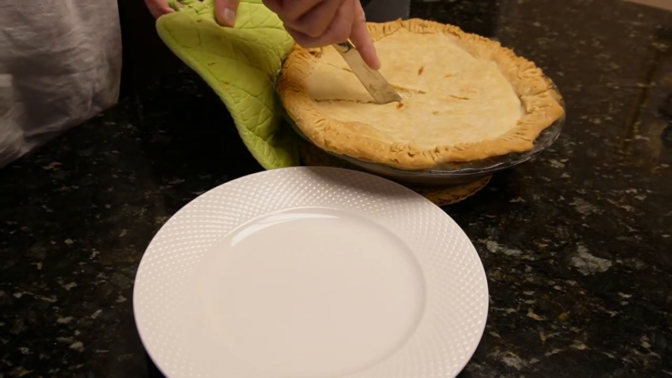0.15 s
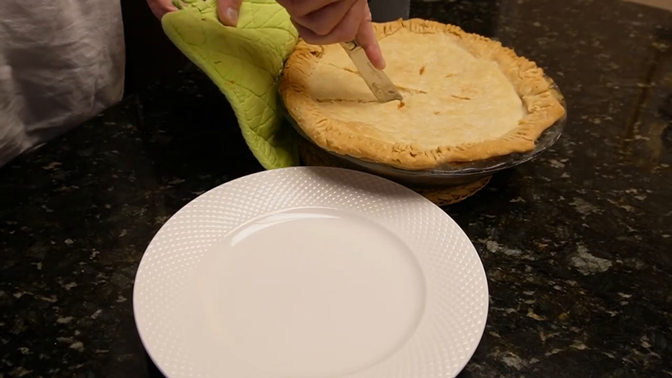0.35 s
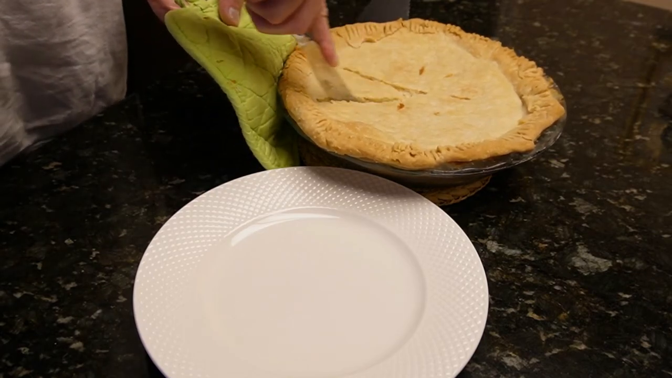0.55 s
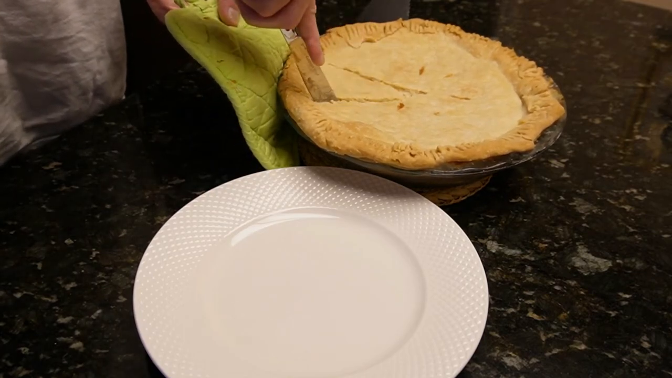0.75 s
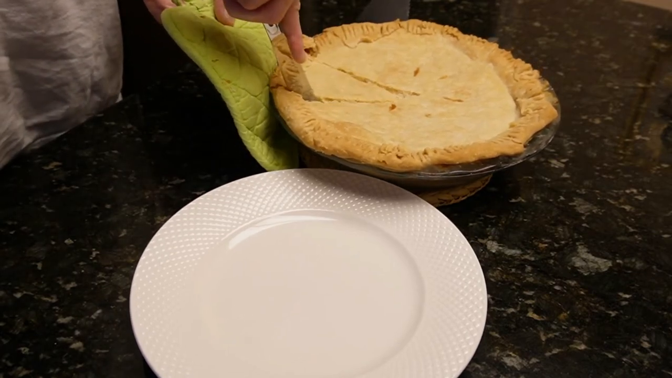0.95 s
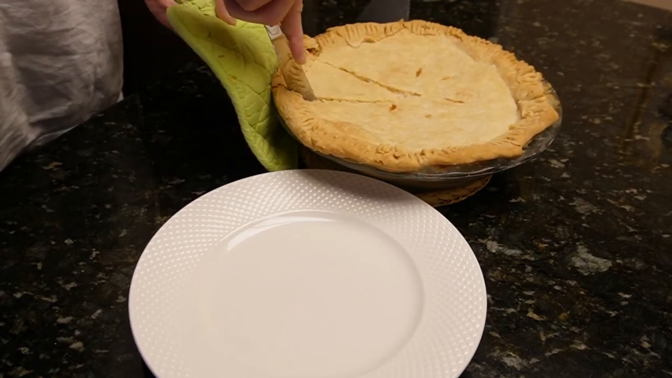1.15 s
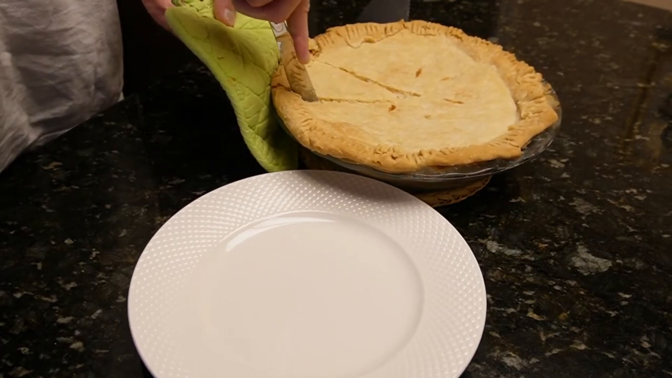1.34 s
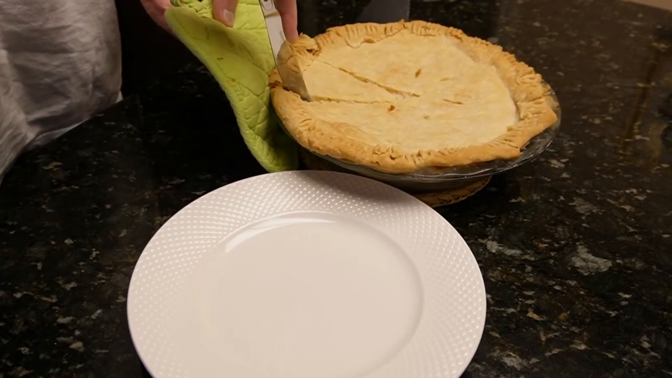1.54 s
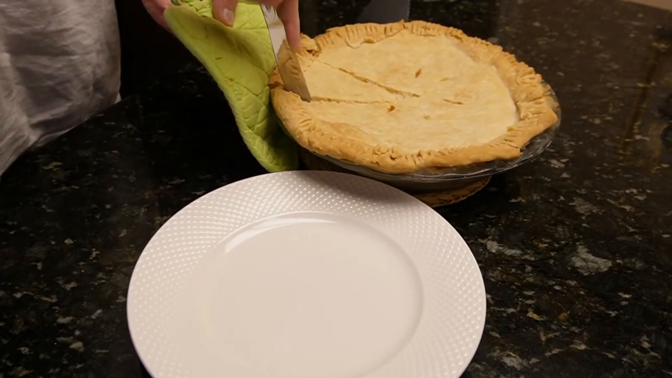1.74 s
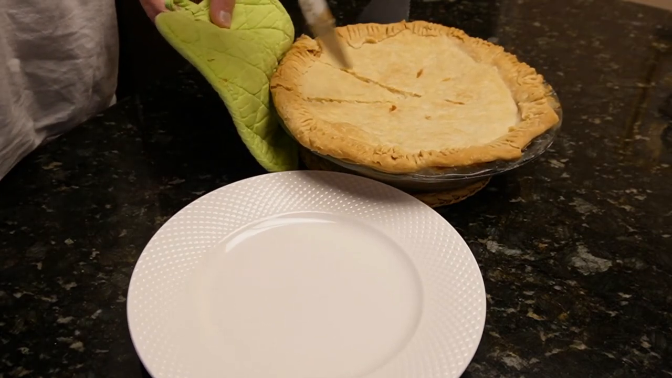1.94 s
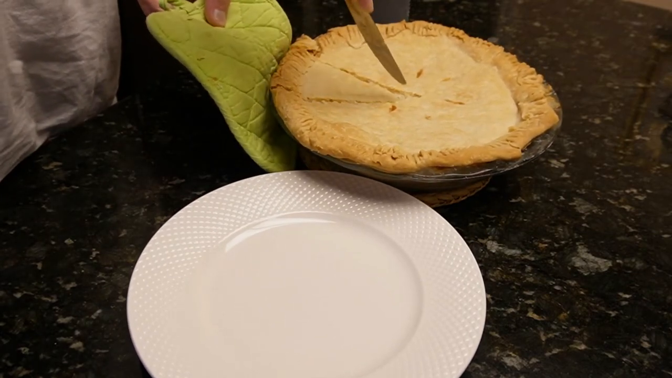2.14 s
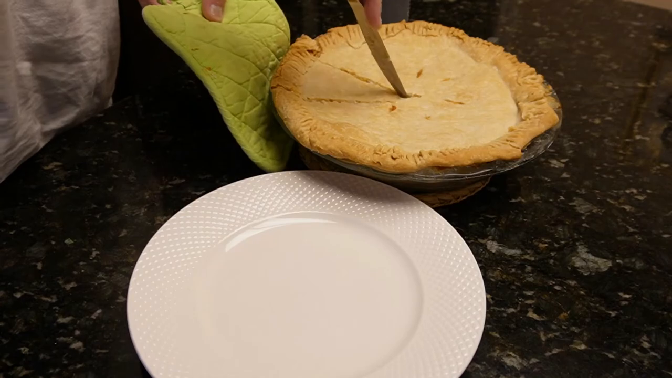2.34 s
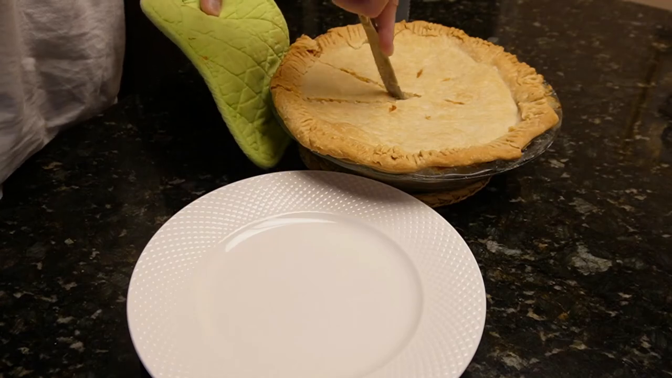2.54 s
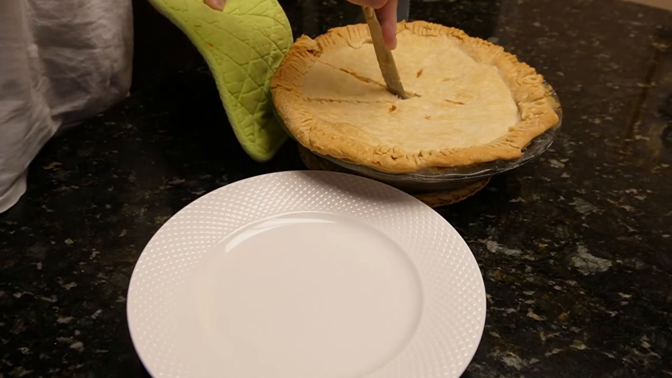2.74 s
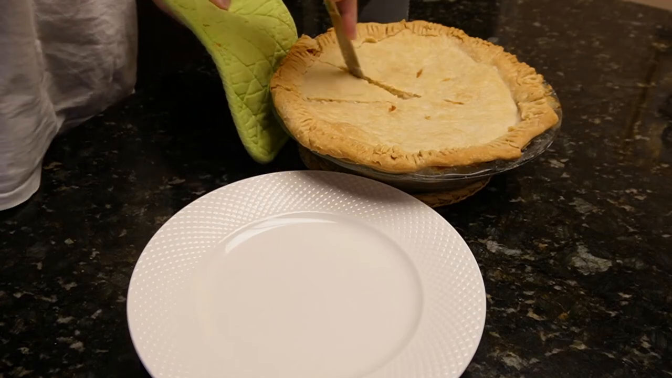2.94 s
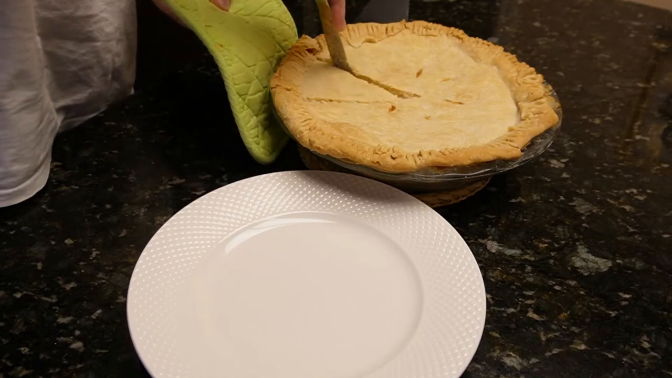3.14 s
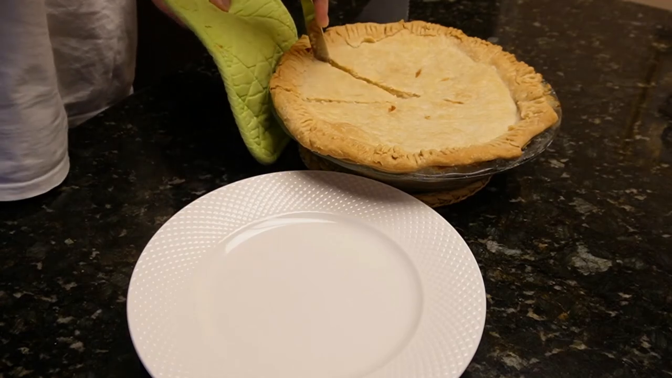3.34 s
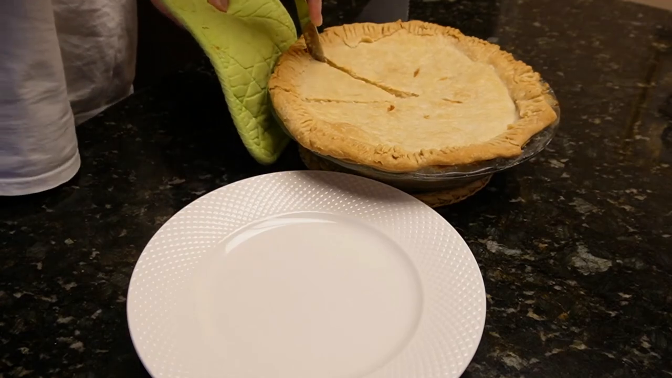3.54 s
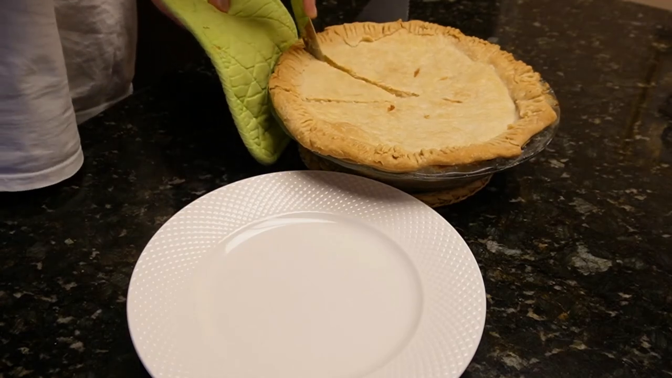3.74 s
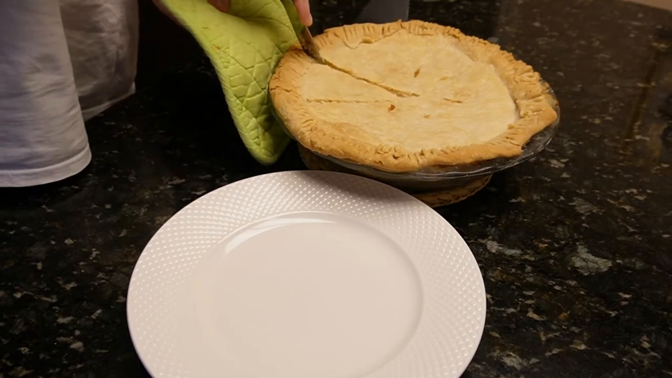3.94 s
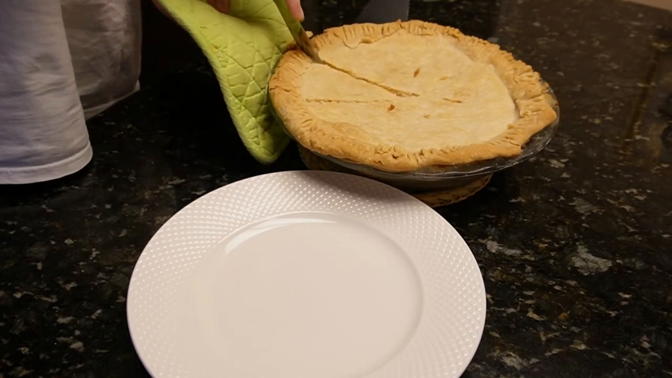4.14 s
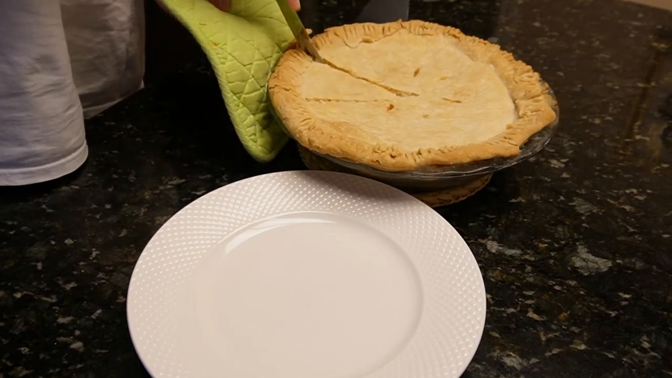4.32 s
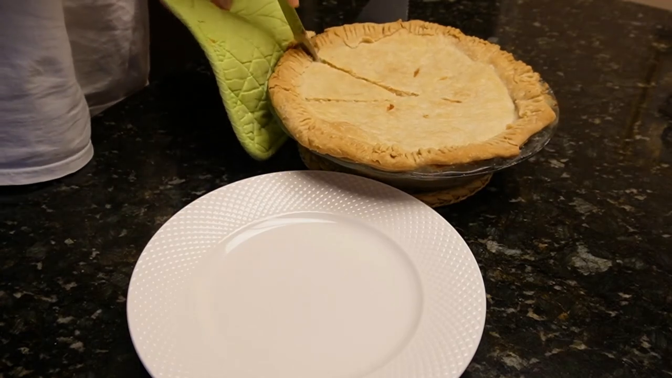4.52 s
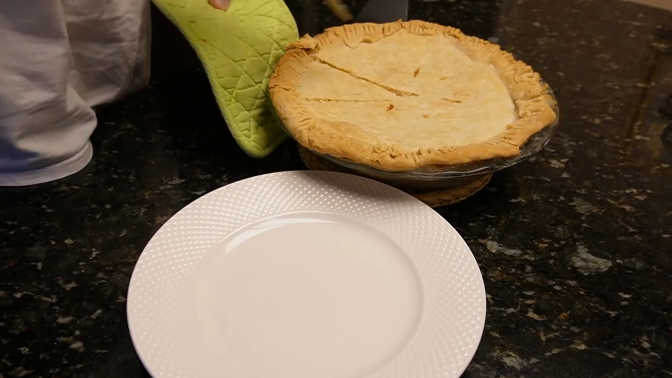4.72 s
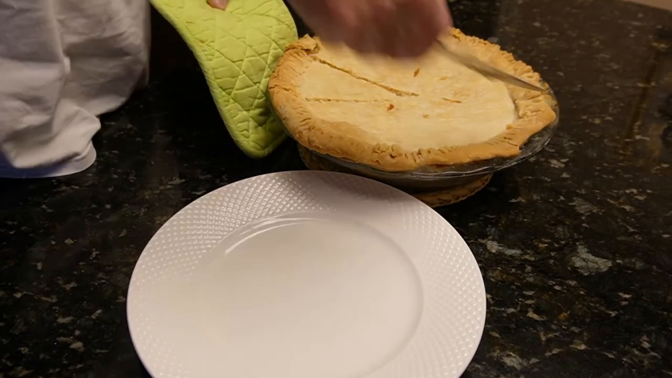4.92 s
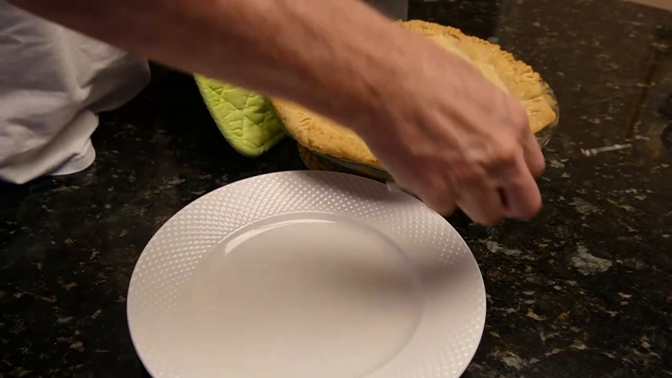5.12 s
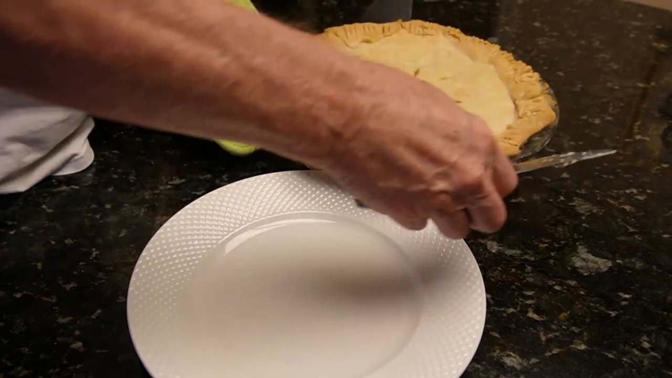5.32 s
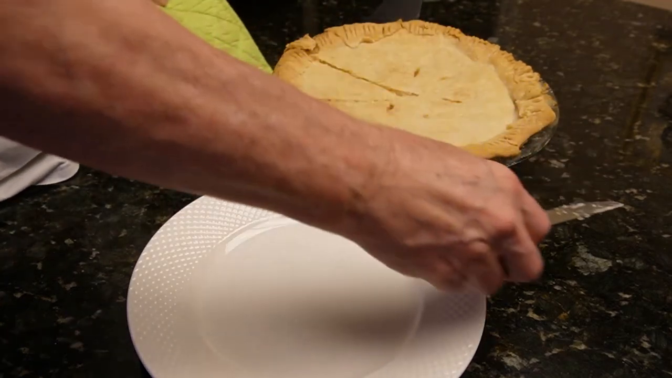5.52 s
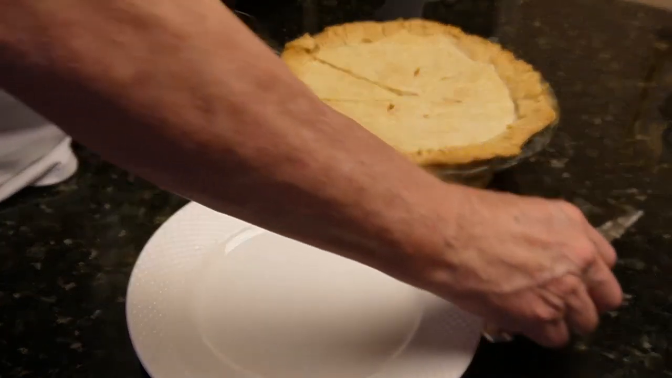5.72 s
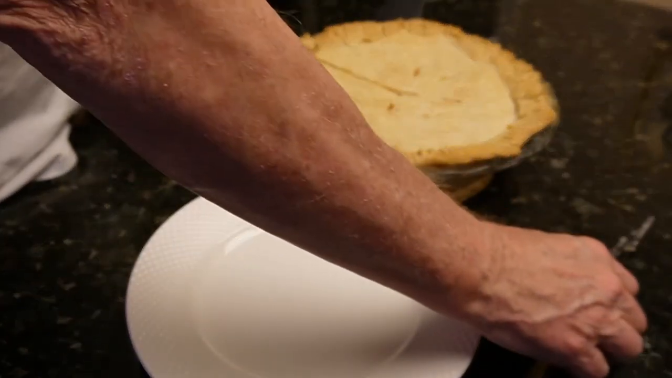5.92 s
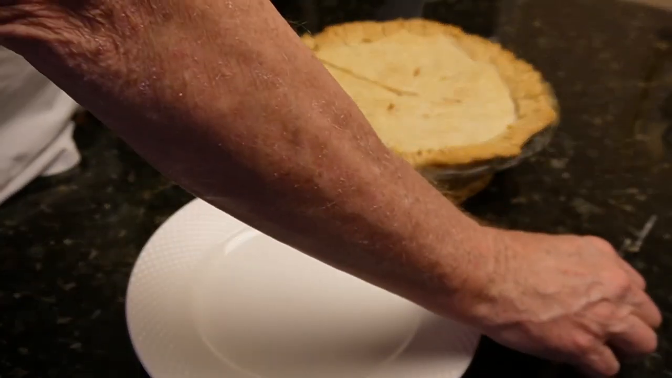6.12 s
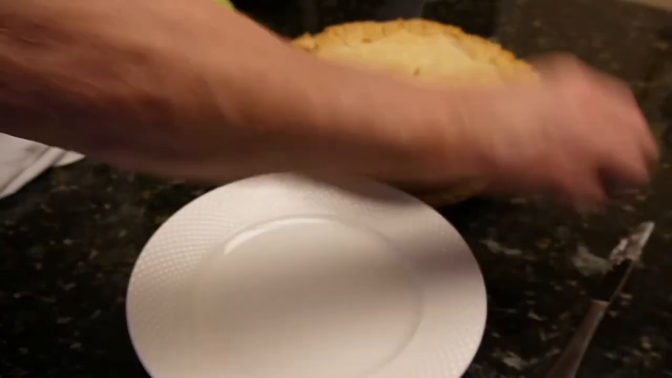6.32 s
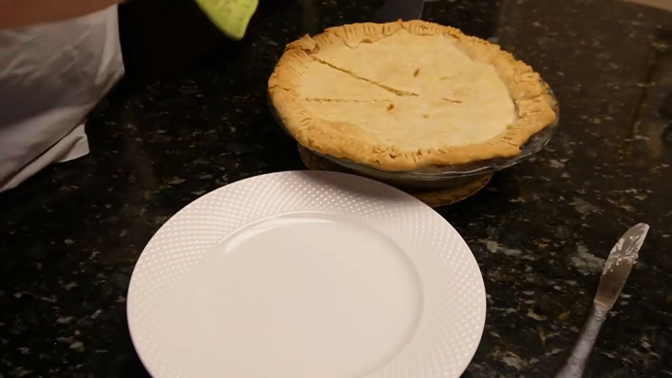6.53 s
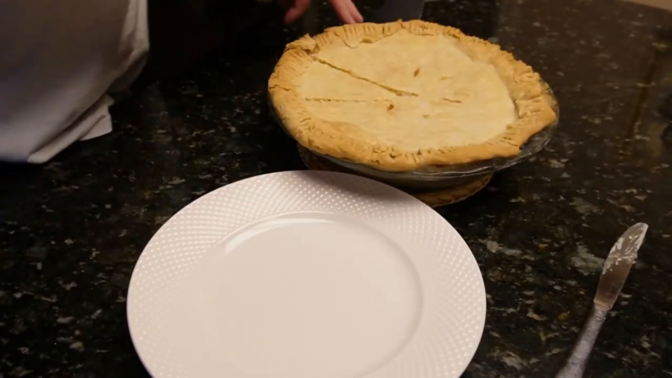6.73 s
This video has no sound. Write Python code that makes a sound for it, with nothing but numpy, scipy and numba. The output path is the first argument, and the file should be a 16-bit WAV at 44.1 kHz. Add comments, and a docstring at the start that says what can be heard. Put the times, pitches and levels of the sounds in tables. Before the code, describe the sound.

A knife clinks and saws squeakily through pie crust in a glass dish before being set down with a metallic clatter.

```python
"""A table knife cuts two lines through a baked pie crust in a glass dish. The blade stabs and rubs through
crumbling pastry, knocks the glass into ringing and saws at the rim with gliding squeaks and sharp snaps.
Then it is laid on a stone counter, where it rocks and rattles. Dish and hand bump softly, a sleeve
rustles and an appliance hums in a hard-walled kitchen."""
import sys
import numpy as np
from scipy import signal
from scipy.fft import rfft, irfft, next_fast_len
from scipy.io import wavfile
from scipy.ndimage import uniform_filter1d
from numba import njit

SR = 44100
rng = np.random.default_rng(int(sys.argv[2]) if len(sys.argv) > 2 else 0)


def persist_wave(psi):
    """Save psi, clipped to +-1, as 16-bit WAV."""
    counts = np.round(np.clip(psi, -1, 1) * 32767).astype(np.int16)
    wavfile.write(sys.argv[1], SR, np.atleast_2d(counts).T)


N = 302967


def amp(db):
    return np.exp(np.asarray(db) * (np.log(10) / 20))


def unit_rms(x):
    return x / np.sqrt(np.mean(x ** 2) + 1e-20)


def butter(x, order, hz, kind="low"):
    return signal.sosfilt(signal.butter(order, hz, kind, fs=SR, output="sos"), x)


def swell(s, db, rise, hold, fall):
    """An envelope that climbs 20 dB per rise time to its top at s, holds, and drops 20 dB per fall time."""
    rise, fall, out = max(rise, 1e-3), max(fall, 1e-3), np.zeros(N)
    first, last = (int(np.clip(v * SR, 0, N)) for v in (s - 4 * rise, s + hold + 4 * fall))
    t = np.arange(first, last) / SR - s
    out[first:last] = amp(db - 20 * np.maximum(np.maximum(-t / rise, (t - hold) / fall), 0))
    return out


def clicks(times, sizes):
    """Single clicks on an inaudible ripple that keeps the filters quick."""
    out = 1e-18 * np.cos(np.arange(N))
    np.add.at(out, np.round(np.asarray(times) * SR).astype(int), sizes)
    return out


def grains(per_s, spread_db):
    """Random clicks of very uneven size, rms about 1."""
    sizes = amp(spread_db * np.minimum(rng.exponential(1, N), 4)) * rng.choice([-1, 1], N)
    return unit_rms(sizes * (rng.random(N) < per_s / SR)) + 1e-18


def ring(x, hz, t60):
    """A unit click sets a sine of height about 1 ringing."""
    r, w = amp(-60 / (t60 * SR)), 2 * np.pi * hz / SR
    return signal.lfilter([.5, 0, -.5], [1, -2 * r * np.cos(w), r * r], x)


def resonances(x, peaks, treble_db=0):
    """Parallel peaks (f/Hz, width/Hz, level/dB) of alternating sign; treble_db lifts those over 4 kHz."""
    out, lifted = 0, x * amp(treble_db)
    for k, (hz, width, db) in enumerate(peaks):
        r = np.exp(-np.pi * width / SR)
        poles = [1, -2 * r * np.cos(2 * np.pi * hz / SR), r * r]
        band = signal.lfilter([1 - r, 0, r - 1], poles, lifted if hz > 4000 else x)
        out = out + (-1) ** k * amp(db) * band
    return out


@njit
def glide(x, hz, width_hz):
    """A resonance whose centre moves."""
    cosine, r = np.cos(2 * np.pi * hz / SR), np.exp(-np.pi * width_hz / SR)
    y = np.zeros(len(x))
    for i in range(2, len(x)):
        y[i] = (1 - r) * (x[i] - x[i - 2]) + 2 * r * cosine[i] * y[i - 1] - r * r * y[i - 2]
    return y


def equalise(x, curve):
    """Shape by an EQ curve of (f/Hz, level/dB) points."""
    hz, db = np.transpose(curve)
    size = next_fast_len(N)
    log_hz = np.log(np.fft.rfftfreq(size, 1 / SR) + 1)
    return irfft(rfft(x, size) * amp(np.interp(log_hz, np.log(hz), db)), size)[:N]


def spread(mid, side):
    """Narrow stereo: left and right differ mainly at short wavelengths."""
    side = butter(side, 1, 3000, "high")
    return np.array([mid + side, mid - side])


def wide_noise(curve, side_db):
    """Stereo noise, alike in the bass and looser in the treble; rms 1."""
    mid, side = rng.standard_normal((2, N))
    return unit_rms(np.array([equalise(channel, curve) for channel in spread(mid, amp(side_db) * side)]))


# EQ of the still room: f/Hz, level/dB
ROOM_TONE_EQ = [(12, -70), (20, -43), (45, -13), (88, -10), (123, -4.5), (150, -11), (187, 1.5),
                (262, -11.5), (367, -9.5), (574, -22.5), (1190, -26.5), (1860, -27), (2020, -28.5),
                (2820, -29.5), (16000, -42.5)]
def room_tone():
    """A steady bed of low, wide noise."""
    return amp(-70.5) * wide_noise(ROOM_TONE_EQ, side_db=3.5)


# partials of the hum: f/Hz, width/Hz, rms level/dB
HUM_PARTIALS = [(62.5, 1.3, -82.5), (118.3, 8.9, -92.5), (177.94, 5.8, -76), (283.5, 49, -80),
                (360.8, 52, -80.5)]
def appliance_hum():
    """Noise passed twice through each narrow resonance gives a wavering hum."""
    noise, out = rng.standard_normal(N), 0
    for hz, width, db in HUM_PARTIALS:
        peak = [(hz, width, 0)]
        out = out + amp(db) * unit_rms(resonances(resonances(noise, peak), peak))
    return out


# decay of the room: f/Hz, t60/s
KITCHEN_DECAY = [(250, 0.82), (1000, 0.53), (3000, 0.47), (7000, 0.39), (13000, 0.17)]
def kitchen_reverb(x, side_db):
    """Hard walls return a dense tail that builds up, then dies away, treble first."""
    t, tail = np.arange(SR * 3 // 4) / SR, 0
    hz, t60 = np.transpose(KITCHEN_DECAY)
    edges = np.r_[60, np.sqrt(hz[1:] * hz[:-1]), 19000]
    for low, high, seconds in zip(edges, edges[1:], t60):
        band = butter(rng.standard_normal((2, len(t))), 2, [low, high], "band")
        tail = tail + band * amp(-60 * t / seconds)
    build_up = 1 - np.exp(-t / 0.0027)
    mid, side = signal.fftconvolve(x[None], tail * build_up, axes=1)[:, :N]
    return spread(mid, amp(side_db) * side)


# EQ of soft rubbing: f/Hz, level/dB
RUB_EQ = [(350, -42), (600, -2.5), (1020, -8), (1130, -2.5), (1240, -5.5), (1870, -9), (3650, -11),
          (7550, -19.5), (15800, -34)]
# soft rubs of cloth and of the knife dragging through crust:
# briskest t/s, level/dB, rise/s, fall/s, brightness/dB
SOFT_RUBS = [(.005, -86, 0.011, 0.095, 13), (.12, -91, 0.3, 0.38, 18.5), (.44, -83.5, .12, 0.25, 17),
             (.62, -73, 0.1, 0.1, -1), (0.877, -77, 0.069, 0.6, 13.5), (2.028, -68, 0.15, 0.13, -13),
             (2.285, -86, 0.013, 0.29, 17), (2.409, -93, 0.11, 0.09, 23), (2.6, -89, 0.051, 0.083, 32.5),
             (3.002, -66, 0.25, 0.12, 14), (3.22, -82, 0.064, 0.064, 24.5),
             (3.466, -82, 0.013, 0.033, 11.5), (3.619, -89.5, .012, 0.017, 20.5),
             (4.748, -79.5, 0.14, 0.25, 4.5), (5.29, -81.5, 0.29, 0.23, 1), (5.44, -82.5, 0.08, 0.26, 25),
             (5.749, -88, 0.16, 0.31, 20)]
def soft_rubbing():
    """Friction noise of cloth or dragging knife swells over a faint floor; a brisker rub lifts the top."""
    friction = wide_noise(RUB_EQ, side_db=-5.5)
    level, treble_lift = amp(-92.5), 0
    for s, db, rise, fall, bright_db in SOFT_RUBS:
        rub = swell(s, db, rise, 0, fall)
        level = level + rub
        treble_lift = treble_lift + rub * (amp(bright_db) - 1)
    return level * friction + treble_lift * butter(friction, 1, 6000, "high")


# bumps of dish and hand: t/s, level/dB, f/Hz
SOFT_BUMPS = [(0.885, -54.5, 268), (.932, -42.5, 230), (1.219, -47, 234), (1.454, -47, 240),
              (1.637, -42.5, 263), (1.997, -49.5, 190.5), (2.548, -48.5, 250), (3.215, -55, 179),
              (3.576, -55.5, 193.3), (3.925, -46.5, 250)]
def soft_bumps(t60=0.082):
    """Each bump is a short low ring from a soft contact, with the counter thudding under it."""
    rings = sum(ring(clicks([s], amp(db)), hz, t60) for s, db, hz in SOFT_BUMPS)
    s, db, _ = np.transpose(SOFT_BUMPS)
    thud = ring(clicks(s, amp(db - 6)), 162, t60)
    return butter(rings + thud, 2, 1200)


# knife meeting the stone: t/s, level/dB, handle-end accent/dB
KNIFE_LANDINGS = [(6.0816, -42, 28.5), (6.2607, -24, 4.5), (6.288, -19, 16.5), (6.315, -18, -14),
                  (6.329, -11.5, -1), (6.383, -28, 3), (6.4141, -10.5, -17), (6.431, -9.5, -8),
                  (6.466, -14.5, -18), (6.494, -24.5, -18), (6.519, -28, -13)]
# spells of rocking: t/s, touch level/dB, clatter level/dB, hold/s, fall/s
ROCKING = [(6.077, -45.5, -47.5, 0.03, 0.073), (6.258, -22.5, -42.5, 0.056, 0.011),
           (6.324, -10, -34.5, 0.057, 0.085), (6.43, -26.5, -36, 0.093, 0.023)]
# modes of the free knife: f/Hz
FREE_KNIFE_HZ = [415, 1481, 4285, 4600, 5727, 6960, 7615, 8150, 8721, 9215, 10675, 10788, 12584, 13105,
                 14497, 14520]
# voicing of those modes: level/dB, t60/s, left minus right/dB
FREE_KNIFE_MODES = [(-31, 0.32, -4.5), (-27, 0.29, -1.5), (-22.5, 0.2, 4.5), (-19, 0.079, -9),
                    (-7, 0.14, -7.5), (-2.5, 0.086, -5), (-17.5, 0.071, -16.5), (-23, 0.21, 14.5),
                    (-0.5, 0.15, 0.5), (-17, 0.13, 5), (-1, 0.083, 1.5), (-15, 0.18, -21.5), (-8, 0.22, 9),
                    (-34, 0.12, -5.5), (-19.5, 0.091, 18), (-13, 0.26, -15.5)]
# modes that ring most when the handle end lands: f/Hz
HANDLE_MODES_HZ = [4285, 4600, 7615, 8150]
# EQ of the clatter between the modes: f/Hz, level/dB
CLATTER_EQ = [(300, -24.5), (600, -21.5), (900, -5), (1200, -13), (1550, -5.5), (2600, -8.5), (4500, -6.5),
              (7000, -13.5), (9000, -8.5), (11500, -35.5), (15000, -23), (15800, -32)]
def knife_rattle(touches_per_s=300, bounce_t60=0.03):
    """Landings and small touches ring the free knife; each mode has its own share of them and own pan."""
    s, db, handle_db = np.transpose(KNIFE_LANDINGS)
    touch_level = sum(swell(at, level, 0, hold, fall) for at, level, _, hold, fall in ROCKING)
    clatter_level = sum(swell(at, level, 0, hold, fall) for at, _, level, hold, fall in ROCKING)
    touches = touch_level * (rng.random(N) < touches_per_s / SR)
    bounce_level = signal.lfilter([1], [1, -amp(-60 / (bounce_t60 * SR))], clicks(s, amp(db - 19)))
    stone = unit_rms(equalise(grains(per_s=3000, spread_db=3.3), CLATTER_EQ))
    ticks = amp(-24) * signal.lfilter([1, 0, -1], [1, -.5, .1], clicks(s, amp(db)))
    out = ((bounce_level + clatter_level) * stone + ticks) * amp([[-1.1], [1.1]])
    for hz, (mode_db, t60, pan_db) in zip(FREE_KNIFE_HZ, FREE_KNIFE_MODES):
        colour_db = 0.4 * np.log2(hz / 7000) + handle_db * (hz in HANDLE_MODES_HZ)
        hit_db = db - 11 + colour_db + rng.normal(0, 6.6, len(s))
        blows = amp(-13.5) * touches * rng.standard_normal(N) + clicks(s, amp(hit_db))
        out += amp(mode_db + np.array([[pan_db], [-pan_db]]) / 2) * ring(blows, hz, t60)
    return out


# ringing hits on the glass and dull tip stabs through the crust:
# t/s, level/dB, thump/dB, top/dB, ring/dB, upper ring/dB, crunch t60/s
KNIFE_KNOCKS = [(0.2708, -82, 24.5, -45, -41, 2, .05), (0.9305, -21.5, -8, -35.5, -14.5, 6.5, 0.063),
                (0.9373, -29, -10, -42.5, -9, 6, 0.018), (0.9539, -26.5, -5, -46.5, -4.5, -3.5, .12),
                (.975, -27.5, -6, -47.5, -10, -1, 0.27), (1.221, -25, -1, -28, -8, -8.5, 0.091),
                (1.2443, -27, -9.5, -46, -31, -19, 0.032), (1.4252, -19.5, -16, -40.5, -32, 8, 0.014),
                (1.455, -26, -3, -32.5, -5, -20.5, 0.12), (1.637, -23.5, -0.5, -19.5, -21, 4.5, 0.025),
                (1.65, -44.5, 5, -23, 7, -36, 0.077), (2.5485, -42.5, 15, 11, -52, -5, 0.015),
                (3.928, -38.5, -6.5, -8, -36, -3.5, 0.015), (3.9375, -37, -6, -45, -22.5, 11.5, 0.018)]
# modes of the glass dish: f/Hz
GLASS_HZ = [375, 826, 884, 1129, 1187, 1789, 1826, 2584, 2705, 2912, 3268, 3945, 3994, 4328, 5109, 6245,
            6930, 7924, 9039, 9787, 10600, 12300, 13800]
# voicing of those modes: level/dB, t60/s
GLASS_MODES = [(-25, .1), (-16.5, .1), (-10, .1), (-44, .12), (-6.5, .09), (2.5, 0.11), (-13.5, 0.15),
               (-5.5, 0.038), (-8, 0.14), (-13, 0.083), (-15.5, .15), (-7.5, 0.093), (-12.5, 0.057),
               (-10, 0.071), (-10, 0.1), (-12, 0.11), (-6, .08), (14.5, 0.029), (7, 0.092), (0.5, 0.08),
               (0.5, 0.06), (-1.5, 0.057), (-2.5, 0.05)]
# dull body under a knock, with its bright tick in the last row: f/Hz, width/Hz, level/dB
KNOCK_BODY = [(356, 10, 20), (861, 165, 24.5), (1130, 1800, -5.5), (1870, 190, 8), (3500, 870, 6),
              (7700, 15000, 6)]
def knife_knocks(contact_hz=6800, top_hz=6600):
    """A click and a dying crunch sound a dull body; hits on the glass ring it, tip stabs hardly do."""
    out, t = np.zeros(N), np.arange(SR // 2) / SR
    click = 1. * (t == 0)
    for s, db, thump_db, top_db, ring_db, upper_db, t60 in KNIFE_KNOCKS:
        crunch = rng.standard_normal(len(t)) * amp(-15.5 + np.maximum(-60 * t / t60, -300))
        colour_db = lambda hz: thump_db * (hz < 1500) + top_db * (hz > top_hz)
        *body, tick = [(hz, width, level + colour_db(hz)) for hz, width, level in KNOCK_BODY]
        hit = click + crunch
        knock = amp(5.5) * (resonances(butter(hit, 3, contact_hz), body) + resonances(hit, [tick]))
        hard_push = click + amp(-7) * crunch
        soft_push = butter(hard_push, 3, contact_hz)    # a broad contact loses the top
        for hz, (mode_db, mode_t60) in zip(GLASS_HZ, GLASS_MODES):
            gain = amp(mode_db + ring_db + colour_db(hz) + upper_db * (hz > 2400))
            knock += gain * ring(soft_push if hz < top_hz else hard_push, hz, mode_t60)
        out[round(s * SR):][:len(t)] += amp(db) * knock
    return out


# blade drawn through pastry: full pressure t/s, level/dB, rise/s, hold/s, grit/dB
PASTRY_CUTS = [(0.583, -66, 0.32, 0.015, -21), (2.758, -69, 0.024, 0.21, -14),
               (3.811, -76.5, 0.01, 0.081, 9)]
# boxy resonances of the pastry lid: f/Hz, width/Hz, level/dB
PASTRY_LID = [(867, 47, 3.5), (1250, 370, -6), (2140, 130, -23.5)]
# dry scratch of the upper crust: f/Hz, width/Hz, level/dB
CRUST_GRIT = [(3020, 1500, 4), (1500, 900, -7)]
def pastry_cuts():
    """Crumbling grains sound through the lid of pastry, with a dry scratch on top."""
    crumbs = grains(per_s=1800, spread_db=1.3)
    box, grit = unit_rms(resonances(crumbs, PASTRY_LID)), unit_rms(resonances(crumbs, CRUST_GRIT))
    return sum(swell(s, db, rise, hold, fall=0.096) * (box + amp(grit_db) * grit)
               for s, db, rise, hold, grit_db in PASTRY_CUTS)


# strokes at the rim: hardest t/s, level/dB, rise/s, squeak f/Hz at that moment,
# glide factor (pulled > 0, pushed < 0, pressed down 0), brightness/dB
SAW_STROKES = [(1.47, -33, .004, 3300, 0, -18), (1.627, -38, 0.11, 3390, -0.034, 2),
               (1.678, -56, 0.034, 3400, -0.17, 12.5), (1.801, -37.5, 0.064, 3000, 0.047, -2.5),
               (1.826, -35.5, 0.018, 3140, 0.37, 8.5), (4.022, -48.5, .025, 2800, 1, -7.5),
               (4.06, -43.5, 0.052, 3100, 1, -3), (4.174, -36.5, 0.05, 2640, -1.26, -11.5),
               (4.259, -35, 0.0088, 2650, 1, -8), (4.37, -54, 0.01, 2880, -1, -4.5),
               (4.404, -39.5, 0.062, 2320, -1, -11), (4.485, -37.5, 0.018, 2530, 1, -9.5),
               (4.528, -34.5, 0.015, 2650, -1, -6), (4.562, -39.5, 0.031, 2280, -1.4, 4)]
# sharp snaps of crust and the bright tick of a knife knock: t/s, level/dB
SNAPS_AND_TICK = [(0.8677, -56.5), (1.8224, -47), (1.8254, -28.5), (1.8328, -30.5), (2.2821, -54),
                  (3.011, -44), (3.2098, -66), (3.467, -72.5), (3.617, -76), (3.9274, -37.5),
                  (4.0178, -39.5), (4.029, -38), (4.0571, -38), (4.14, -48), (4.178, -29.5), (4.2488, -28),
                  (4.2594, -34.5), (4.3655, -36.5), (4.4005, -33), (4.4744, -26.5), (4.485, -38),
                  (4.532, -51), (4.5452, -36), (4.5547, -30), (4.5694, -38.5), (6.0529, -52)]
# modes of the held blade and rim: f/Hz
HELD_BLADE_HZ = [1050, 1740, 2690, 3340, 4330, 4990, 5180, 5950, 6920, 8150, 8950, 10900, 5500, 13000]
# voicing of those modes: width/Hz, level/dB
HELD_BLADE_MODES = [(220, -10.5), (55, -4.5), (263, -13.5), (140, -1.5), (39.7, -26), (260, -2.5), (60, -8),
                    (150, -17), (60, -7), (60, -14), (50.6, -20.5), (70, -44.5), (4900, -35.5),
                    (3000, -37.5)]
def rim_sawing(glide_hz_per_s=17400, squeak_range_hz=(2166, 3550), buried_s=.085):
    """Teeth, crumbs and sharp clicks ring the held blade; its squeak glides as its free length changes."""
    t = np.arange(N) / SR
    peak_s, stroke_db, rise, peak_hz, way, stroke_bright_db = np.transpose(SAW_STROKES)
    strokes = np.array([swell(*row, hold=0, fall=0.039) for row in zip(peak_s, stroke_db, rise)])
    rasp = strokes.sum(axis=0) * grains(per_s=4000, spread_db=3)
    loudest = strokes.argmax(axis=0)
    since_peak = t - peak_s[loudest]
    buried = np.abs(since_peak) < buried_s    # deep in the crust, which sets the blade's brightness
    bright_db = np.clip(np.interp(t, peak_s, stroke_bright_db), -30, 14) * buried
    snap_s, snap_db = np.transpose(SNAPS_AND_TICK)
    snaps = clicks(snap_s, amp(snap_db))
    tick = signal.lfilter([1, 0, -1], [1, -.9, .35], snaps * amp(bright_db - 13.5))
    dry_peaks = [(1050, 500, -8.5), (1800, 500, -1.5), (2650, 1100, 3.5)]
    crack = amp(18.5) * resonances(butter(snaps, 4, 3900), dry_peaks)
    squeak_hz = np.clip(peak_hz[loudest] + way[loudest] * glide_hz_per_s * since_peak, *squeak_range_hz)
    squeak = glide(amp(9) * rasp + amp(12) * snaps, squeak_hz, width_hz=200)
    modes = [(hz, *voicing) for hz, voicing in zip(HELD_BLADE_HZ, HELD_BLADE_MODES)]
    blade = resonances(amp(10.5) * rasp + amp(22) * snaps, modes, treble_db=bright_db)
    return blade + squeak + crack + tick


def scene():
    """Dish centre, clatter slightly right; the sawing, shielded by the hand, reaches the walls less."""
    dish = knife_knocks() + pastry_cuts() + soft_bumps()
    sawing, rattle = rim_sawing(), knife_rattle()
    direct = (dish + sawing) * amp([[.2], [-.2]]) + rattle
    send = dish + amp(-4) * sawing + rattle.mean(axis=0)
    reverb = amp(-37.5) * kitchen_reverb(send, side_db=-3)
    return direct + reverb + soft_rubbing() + room_tone() + appliance_hum()


def record(dry):
    """A limiter holds the peaks down and lets go quickly; a steep low-pass cuts the top."""
    limit_db, release_db_per_s, cutoff_hz = -19, 197, 16500
    release_db = release_db_per_s * np.arange(N) / SR
    over_db = np.maximum(20 * np.log10(np.abs(dry).max(axis=0) + 1e-9) - limit_db, 0)
    reduction_db = uniform_filter1d(np.maximum.accumulate(over_db + release_db) - release_db, size=45)
    low_pass = signal.cheby2(12, 60, cutoff_hz, fs=SR, output="sos")
    return signal.sosfilt(low_pass, dry * amp(-reduction_db))


dry = scene()
out = record(dry)
persist_wave(out)
```